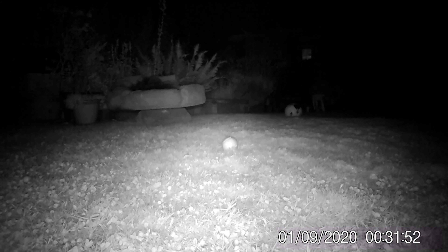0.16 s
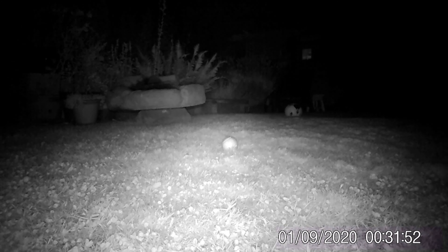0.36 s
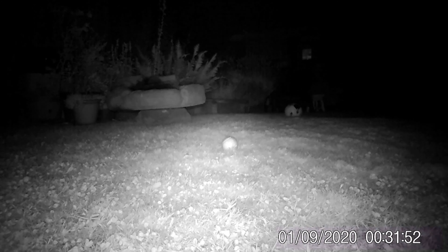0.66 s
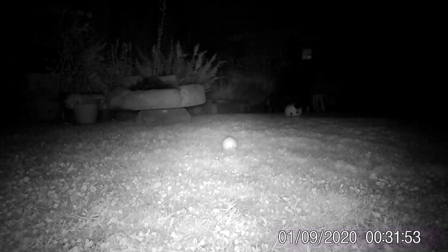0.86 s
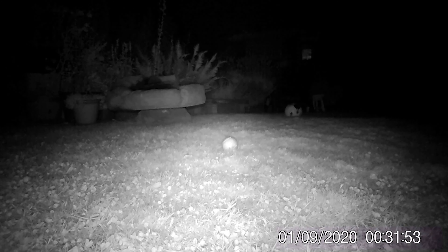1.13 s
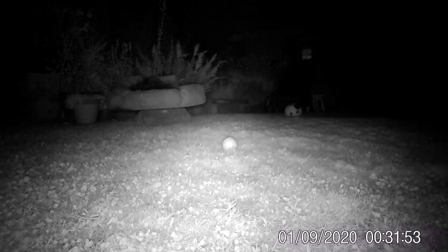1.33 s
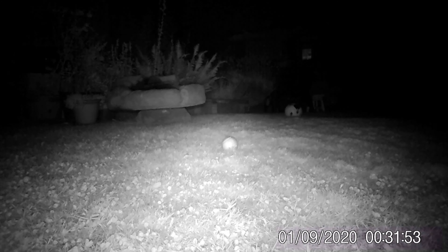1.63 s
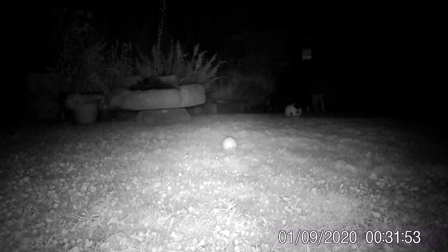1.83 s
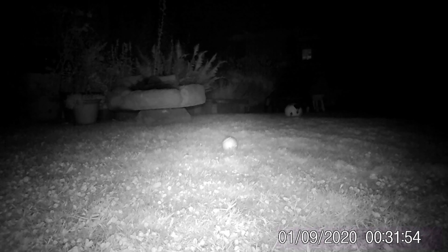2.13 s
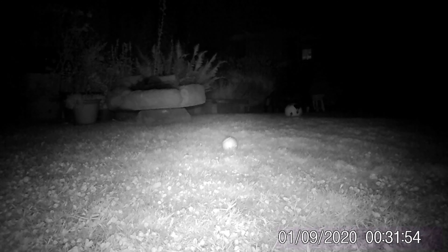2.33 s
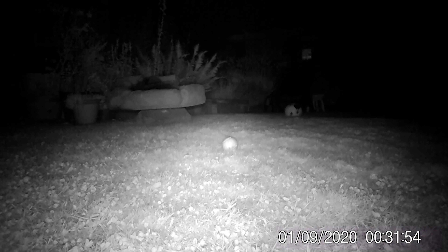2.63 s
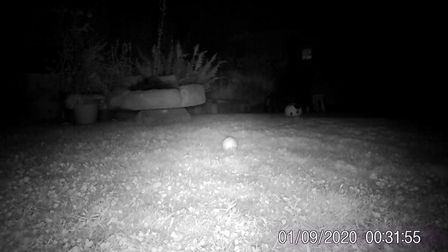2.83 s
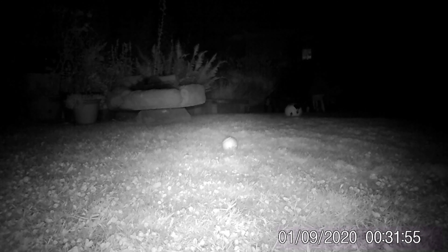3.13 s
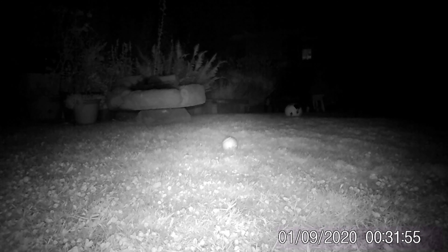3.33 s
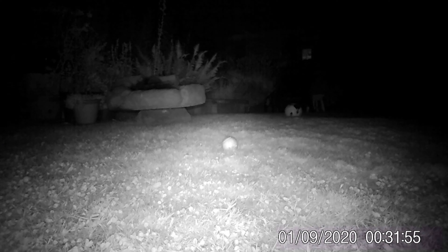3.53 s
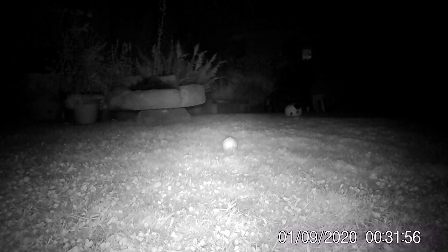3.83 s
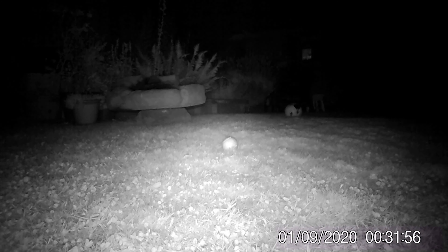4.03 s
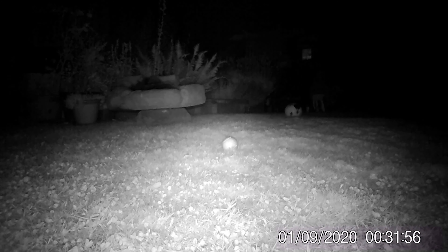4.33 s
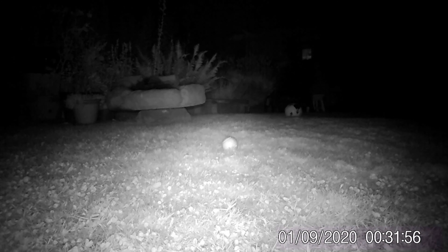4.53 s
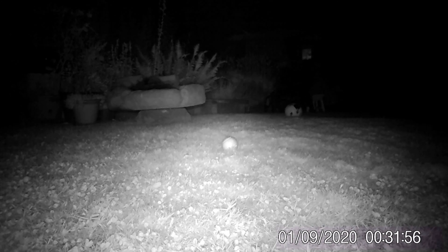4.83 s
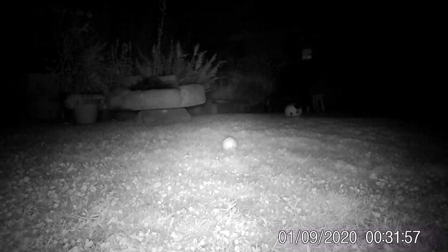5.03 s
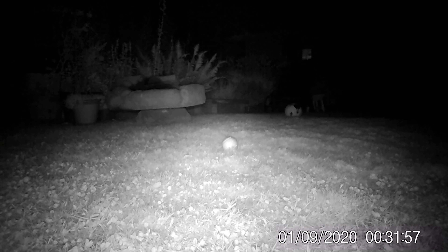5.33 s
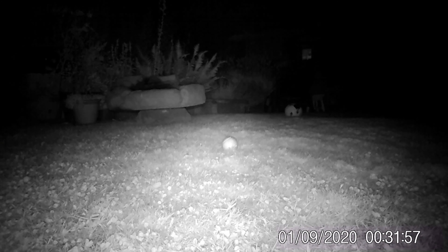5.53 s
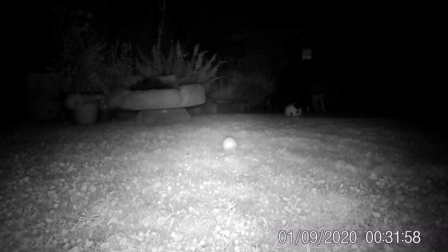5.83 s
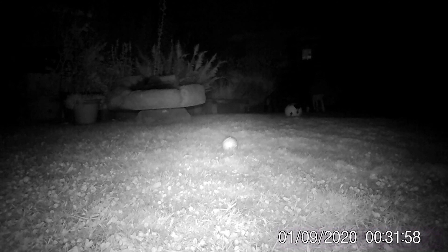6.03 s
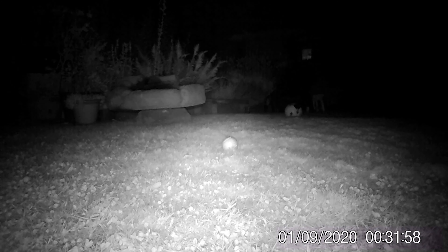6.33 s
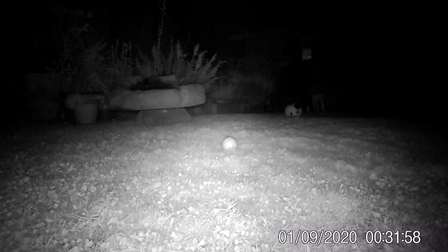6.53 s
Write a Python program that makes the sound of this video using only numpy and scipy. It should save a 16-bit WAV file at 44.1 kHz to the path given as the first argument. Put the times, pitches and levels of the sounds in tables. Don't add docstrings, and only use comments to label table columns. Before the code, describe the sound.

A raccoon gives one rapid, raspy trill and later two soft murmuring trills beside a trickling garden fountain, over pump hum and low traffic rumble.

```python
import sys
import numpy as np
from scipy import signal
from scipy.fft import rfft, irfft, next_fast_len
from scipy.io import wavfile

SR = 44100
rng = np.random.default_rng(int(sys.argv[2]) if len(sys.argv) > 2 else 0)


def log_audio(samples):
    frames = np.atleast_2d(samples).T
    limited = np.clip(frames, -1, 1)
    pcm = np.round(limited * 32767).astype(np.int16)
    wavfile.write(sys.argv[1], SR, pcm)


def boost_factor(decibels):
    exponent = np.asarray(decibels, float) / 20
    return 10 ** exponent


N = 294147


def rms_one(x):
    return x / np.sqrt(np.mean(x ** 2) + 1e-20)


def drift(rate):
    r = np.exp(-80 * np.pi * rate / SR)
    warm_up = 2000
    noise = rng.standard_normal(N // 40 + warm_up + 2)
    slow = signal.lfilter([1], [1, -2 * r, r * r], noise)[warm_up:]
    return np.interp(np.arange(N) / 40, np.arange(len(slow)), rms_one(slow))


def coloured(spectrum, patchy_db=0., shared_db=0., rate=10):
    size = next_fast_len(N)
    octave = np.log2(np.arange(size // 2 + 1) * SR / size + 1e-3)
    hz, level_db = np.transpose(spectrum)
    curve_db = np.interp(octave, np.log2(hz), level_db, left=-150, right=-150)
    shaped = rfft(rng.standard_normal(size)) * boost_factor(curve_db)
    together = drift(rate)
    out = np.zeros(N)
    for centre in np.arange(np.log2(hz[0]), np.log2(hz[-1]) + .5, .5):
        triangle = np.clip(1 - 2 * abs(octave - centre), 0, 1)
        slice_of_noise = irfft(shaped * triangle, size)[:N]
        out += slice_of_noise * boost_factor(patchy_db * drift(rate) + shared_db * together)
    return rms_one(out)


def tones(lines, waver_db):
    t = np.arange(N) / SR
    out = np.zeros(N)
    for hz, rms_db in lines:
        level = np.sqrt(2) * boost_factor(rms_db + waver_db * drift(2.1))
        out += level * np.sin(2 * np.pi * (hz * t + rng.random()))
    return out


def resonance(x, hz, width_hz):
    r = np.exp(-np.pi * width_hz / SR)
    zeros = np.array([1, 0, -1]) * (1 - r * r) / 2
    poles = [1, -2 * r * np.cos(2 * np.pi * hz / SR), r * r]
    return signal.lfilter(zeros, poles, x + 1e-18)


def band_pass(x, low_hz, high_hz):
    sos = signal.butter(2, [low_hz, high_hz], "band", fs=SR, output="sos")
    return signal.sosfilt(sos, x + 1e-18)


def low_pass(x, hz, order):
    return signal.sosfilt(signal.butter(order, hz, fs=SR, output="sos"), x)


def spurt(width):
    t = np.arange(-.005, .005, 1 / SR)
    return rng.standard_normal(len(t)) * np.exp(-(t / width) ** 2)


def add(out, s, piece):
    i = max(round(s * SR), 0)
    out[i:i + len(piece)] += piece[:N - i]


def traffic():
    # (time [s], level [dB])
    swell = [(0, -36), (1.2, -36.5), (1.8, -36), (2.3, -31.5), (2.8, -32.5), (3.2, -32.5), (3.8, -34.5),
             (4.3, -34), (4.8, -34.5), (5.3, -35), (5.8, -36), (6.298, -33), (6.67, -30.5)]
    # (frequency [Hz], density [dB per Hz])
    rumble = [(20, -6.5), (45, 0), (70, 3.5), (110, 2), (135, -2), (160, 1), (240, -2), (275, -14),
              (340, -24.5)]
    s, level_db = np.transpose(swell)
    level = boost_factor(np.interp(np.arange(N) / SR, s, level_db) - 1.5)
    return level * coloured(rumble, patchy_db=-1.0, shared_db=-1.7, rate=3.0)


def pump():
    # (frequency [Hz], level [dB rms])
    hum = [
        (59.95, -39.5),
        (179.85, -45.5),
        (539.55, -43),
    ]
    return tones(hum, waver_db=0.0)


def drip(hz, cycles, hook, wobble):
    length_s = min(max(cycles, 4) / hz, .08)
    t = np.arange(round(length_s * SR)) / SR
    start = (1 - np.exp(-t / .0008)) ** 2
    pitch = hz * (1 + hook * np.exp(-t / 0.00084) + 0.018 * wobble * np.sin(2 * np.pi * 90 * t))
    fade = boost_factor(-70 * t * hz / cycles)
    fade = fade + 0.097 * boost_factor(-30 * t * hz / cycles) * np.cos(np.pi / 2 * t / t[-1])
    beat = 1 + 0.2 * np.sin(2 * np.pi * (170 + 60 * wobble) * t + 3 * wobble)
    return start * beat * fade * np.sin(2 * np.pi * np.cumsum(pitch) / SR)


def single_drops():
    # (loudest moment [s], peak level [dB], bubble pitch [Hz])
    plops = [(0.0602, -14, 2590), (.1432, -16.5, 2780), (0.3731, -11, 1830), (0.6224, -13.5, 1730),
             (.623, -17, 3000), (.709, -16.5, 1960), (0.7435, -11, 3160), (1.001, -17, 2885),
             (1.041, -14.5, 2380), (1.064, -15.5, 2510), (1.067, -13.5, 1745), (1.1542, -14.5, 1730),
             (1.2322, -14.5, 2080), (1.343, -16, 2050), (1.528, -22, 1830), (1.7263, -16.5, 2720),
             (1.745, -15, 2160), (3.5958, -16, 2600), (3.742, -16.5, 2060), (3.9153, -14.5, 1710),
             (4.5057, -19, 1710), (4.627, -16, 2300), (4.648, -18, 1610), (4.9015, -12.5, 2810),
             (5.0752, -13.5, 1380), (5.2213, -17, 2190), (5.5452, -13.5, 1760), (6.2435, -14, 2050),
             (6.4374, -20, 2971), (6.4957, -16, 2200)]
    # (loudest moment [s], peak level [dB], bubble pitch [Hz])
    ringing = [(.0165, -21.5, 1504), (0.1974, -23, 2750), (0.7826, -22.5, 1464), (0.9743, -23, 2360),
               (1.14, -21, 2280), (1.494, -16.5, 3230), (1.526, -14.5, 2770), (1.546, -19, 2090),
               (1.695, -23, 2440), (1.735, -23, 1204), (2.0678, -22, 2120), (2.16, -23, 1510),
               (2.8457, -21, 2700), (3.338, -24.5, 1640), (3.6313, -17.5, 1620), (3.683, -17.5, 1630),
               (3.705, -24, 1570), (4.12, -21.5, 2300), (4.2259, -23, 1340), (4.2399, -26, 1360),
               (4.3058, -20, 1750), (4.604, -16, 2080), (4.711, -20.5, 1660), (4.9577, -23, 3100),
               (5.1262, -19, 1660), (5.187, -15, 1606), (5.3858, -23.5, 2325), (6.0434, -20.5, 2310),
               (6.195, -21.5, 2330), (6.3178, -19.5, 2600)]
    strays = [(when * N / SR, -26 + 7 * size, 1114 * boost_factor(10 * pitch))
              for when, size, pitch in rng.random((80, 3))]
    drops = [(s, db, hz, .011 * hz + 20.8) for s, db, hz in [*plops, *strays]]
    for s, db, hz in ringing:
        drops.append((s, db, hz, 81 - (-14.5 - db)))
    return drops


def fountain():
    # (frequency [Hz], density [dB per Hz])
    trickle = [(150, -31), (250, -7.5), (438, -5.5), (486, -8.5), (540, -9), (593, -6.5), (892, -6.5),
               (1140, -8.5), (1300, -7), (2970, -10), (3300, -10.5), (3710, -14), (4070, -21), (5290, -35),
               (8950, -120)]
    out = boost_factor(-33) * coloured(trickle, patchy_db=2.5, shared_db=1.19, rate=44)
    splashes = np.zeros(N)
    for when, pitch, size, life in rng.random((400, 4)):
        bubble = drip(900 * boost_factor(12.5 * pitch), 18 + 30 * life, hook=0.21, wobble=2 * size - 1)
        add(out, when * N / SR, boost_factor(-37.5 + 3.6 * size) * bubble)
    for when, size in rng.random((160, 2)):
        add(splashes, when * N / SR, boost_factor(-35.5 + 12.8 * size) * spurt(width=0.0023))
    for s, db, hz, cycles in single_drops():
        bubble = drip(hz, cycles, hook=0.31, wobble=rng.uniform(-1.43, 1))
        add(out, s - .0035, boost_factor(db + 0.5) * bubble)
        add(splashes, s - .006, boost_factor(db - 8.5) * spurt(width=.002))
    return out + band_pass(splashes, low_hz=890, high_hz=3700)


def chirp(top_hz, harmonics, length, rise, fall, rough_db):
    u = np.arange(-1.1, .6, 1 / (length * SR))
    top = -0.291
    pitch = top_hz * (1 - np.where(u < top, rise, fall) * abs(u - top) ** 1.642)
    unsteady = np.interp(u, np.linspace(u[0], u[-1], num=16), rng.standard_normal(size=16))
    pitch = pitch * (1 + .015 * unsteady)
    phase = 2 * np.pi * np.cumsum(pitch) / SR
    opening = np.clip((u + 1.23) / 0.47, 0, 1) ** 0.76
    flare = np.exp(-(u / 0.089) ** 2)
    flutter = rng.standard_normal((5, 14))
    out = np.zeros(len(u))
    for k, (held_db, flare_db, swell_db, linger) in enumerate(harmonics):
        closing = np.exp(-(np.maximum(u + 0.22, 0) / linger) ** 3.6)
        held = boost_factor(held_db + swell_db * np.minimum(u - top, 0)) * opening * closing
        wander = np.interp(u, np.linspace(u[0], u[-1], num=14), flutter[k])
        uneven = boost_factor(rough_db * min(k + 0.21, 1.2) * wander)
        out += (held + boost_factor(flare_db) * flare) * uneven * np.sin((k + 1) * phase + 1.47 * k)
    return out, 1.1 * length


def trill():
    # (throat closes [s], top pitch [Hz], fundamental peak [dB],
    # 2nd harmonic above it [dB], closing bloom above it [dB])
    chirps = [(2.021, 857, -24, -28, -16), (2.064, 810, -20.5, -19, -3), (2.103, 850, -22.5, -14, -11),
              (2.146, 896, -22, -14, -6), (2.187, 990, -23, 1, 2), (2.2242, 1003, -15.5, -0.5, 2.5),
              (2.264, 1026, -24.5, 8.5, 13), (2.305, 1000, -30, 7, 9.5), (2.345, 1030, -22.5, -1, 8.5),
              (2.386, 1045, -21.5, -8, 9.5), (2.4273, 1042, -20.5, -13.5, 8.5),
              (2.4694, 1007, -20, -7.5, 5), (2.515, 1030, -19.5, -14, 6), (2.562, 1009, -20, -16, 6),
              (2.612, 974, -21, -8.5, 2.5), (2.671, 882, -22.5, -5.5, 1.5)]
    # (time [s], 4th harmonic above the 2nd [dB], 3rd harmonic against its bloom [dB])
    lips = [(2.02, 2.5, -11), (2.2, -1.5, -2.5), (2.3, -4.5, -10.5), (2.41, 2, -5), (2.47, -3, -11),
            (2.54, 11.5, -15.5), (2.67, 1.5, -1.5)]
    lips_s, bright_db, third_db = np.transpose(lips)
    out, rasps = np.zeros((2, N))
    last = chirps[0][0] - .04
    for s, hz, db, second, bloom in chirps:
        length = min(.37 * (s - last), .019)
        last = s
        bright = np.interp(s, lips_s, bright_db)
        third = np.interp(s, lips_s, third_db)
        fall = .97
        if second > 4:
            fall = 0.61
        elif s > 2.59:
            fall = .64
        fourth_db = db + second + bright
        harmonics = [(db, db - 33, 6, .45),
                     (db + second, db + second - 14, 12, .25),
                     (db + bloom + third - 2.5, db + bloom - 8.5, 16, .22),
                     (fourth_db, db + bloom - 13.5, 4, .22),
                     (fourth_db - 13, db + bloom - 17, 4, .2)]
        puff, lead = chirp(hz, harmonics, length, rise=0.285, fall=fall, rough_db=3.0)
        add(out, s - lead, puff)
        add(rasps, s - .005, boost_factor(db + bloom - 0.5) * spurt(width=0.0042))
    out = out + band_pass(rasps, low_hz=1400, high_hz=4100)
    return out + boost_factor(2) * resonance(out, hz=2990, width_hz=280)


def murmurs():
    # (throat closes [s], top pitch [Hz], peak level [dB], length [s])
    soft_chirps = [
        (5.402, 783, -28.5, .014),
        (5.447, 755, -33, .014),
        (5.499, 742, -29, .016),
        (5.546, 776, -27, .016),
        (6.001, 807, -27, .014),
        (6.035, 816, -26, 0.016),
        (6.083, 810, -23.5, 0.019),
        (6.143, 598, -30, .02),
    ]
    out = np.zeros(N)
    for s, hz, db, length in soft_chirps:
        harmonics = [(db, db - 10, 5, .35), (db - 32, db - 30, 3, .25)]
        puff, lead = chirp(hz, harmonics, length, rise=0.38, fall=0.74, rough_db=-2.0)
        add(out, s - lead, puff)
    return out


def garden(x):
    # (delay [s], level [dB])
    echoes = [
        (.007, -23.5),
        (.012, -22.5),
        (.019, -42),
        (.031, -22.5),
    ]
    out = x.copy()
    for delay, db in echoes:
        add(out, delay, boost_factor(db) * x)
    return out


def scene():
    raccoon = garden(trill() + murmurs())
    return (traffic() + pump() + fountain() + raccoon)[None]


def sensor_hiss():
    # (frequency [Hz], density [dB per Hz])
    hiss_spectrum = [(4000, -26), (5000, -0.5), (6500, 1), (8000, -1.5), (11100, 1), (11500, 5),
                     (12000, 8.5), (12600, 4), (12900, 1.5), (15900, 0.5)]
    return boost_factor(-65) * coloured(hiss_spectrum)


def clock_tones():
    # (multiple of the clock [1], level [dB rms])
    clock_lines = [(3, -78), (4, -85), (5, -79), (6, -74), (7, -79), (8, -63), (9, -76), (10, -79)]
    return tones([(k * 1500, db) for k, db in clock_lines], waver_db=.2)


def slow_sampling(x):
    band_top_hz, sampling_hz = 4008, 8000
    narrow = low_pass(x, band_top_hz, order=24)
    mirror = 2 * narrow * np.cos(2 * np.pi * sampling_hz * np.arange(N) / SR)
    narrow = narrow + boost_factor(-1) * low_pass(mirror, band_top_hz, order=28)
    return narrow + boost_factor(-44) * low_pass(mirror, 5200, order=8)


def top_cut(x):
    return signal.sosfilt(signal.butter(12, 15730, fs=SR, output="sos"), x)


def record(dry):
    rounded = .7 * np.tanh(dry / .7)
    mix = slow_sampling(rounded) + sensor_hiss() + clock_tones()
    return top_cut(mix)


dry = scene()
out = record(dry)
log_audio(out)
```